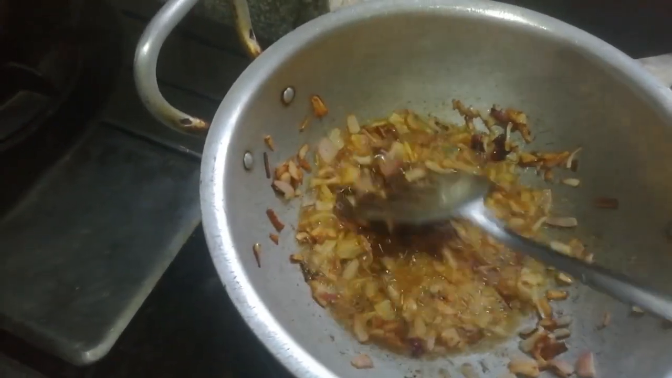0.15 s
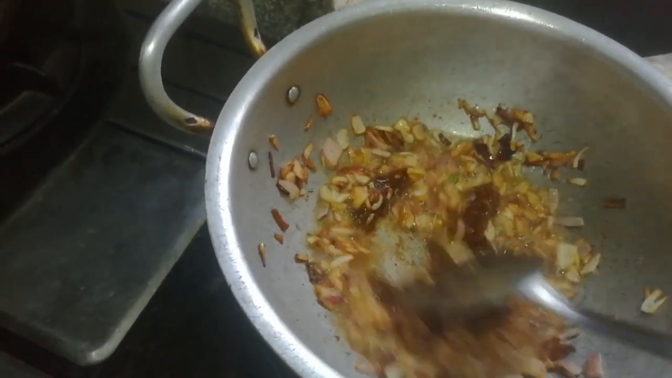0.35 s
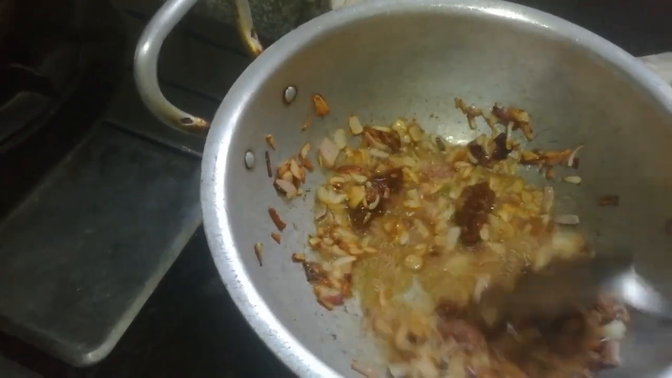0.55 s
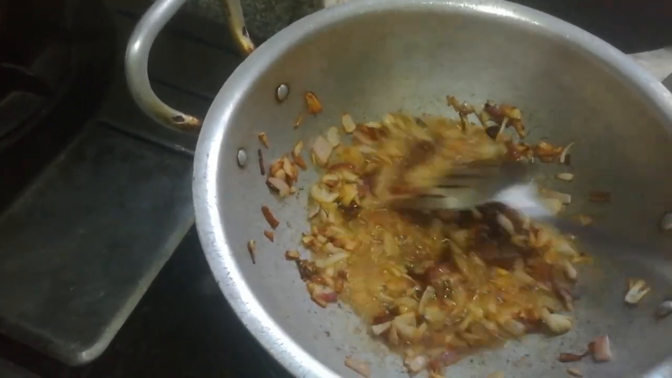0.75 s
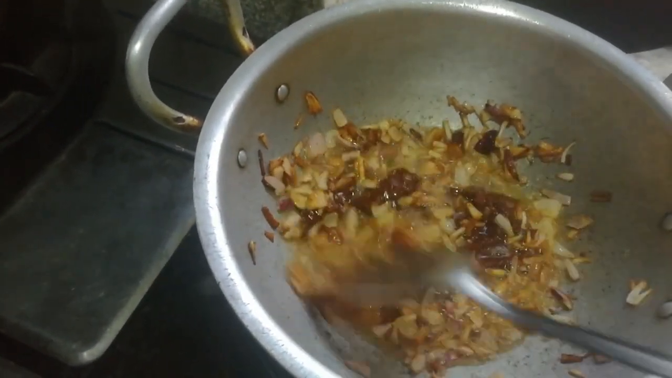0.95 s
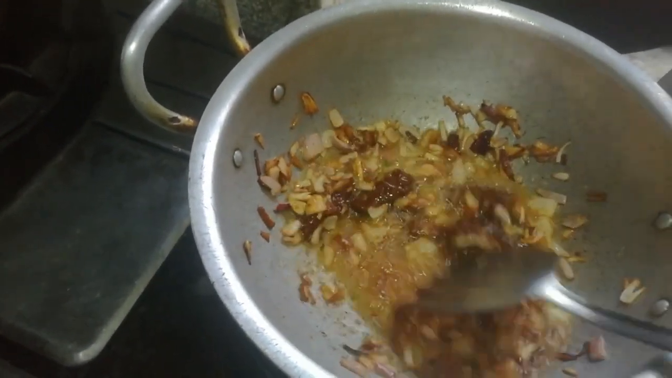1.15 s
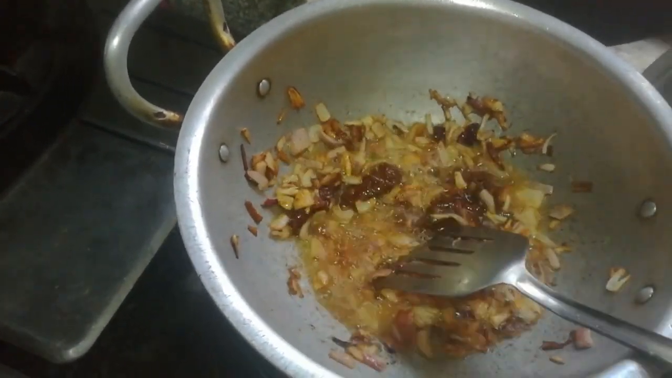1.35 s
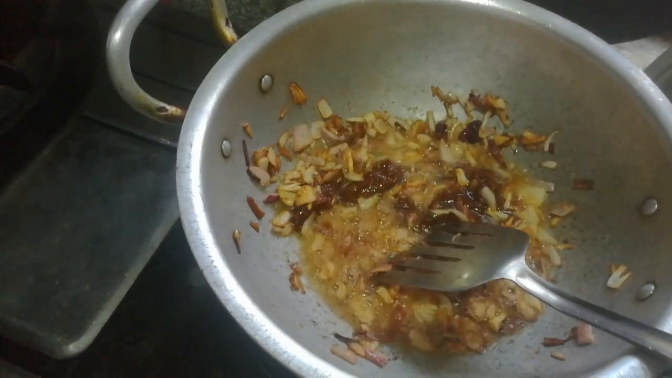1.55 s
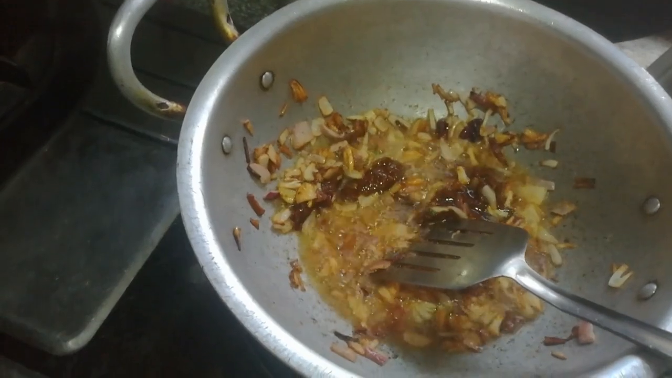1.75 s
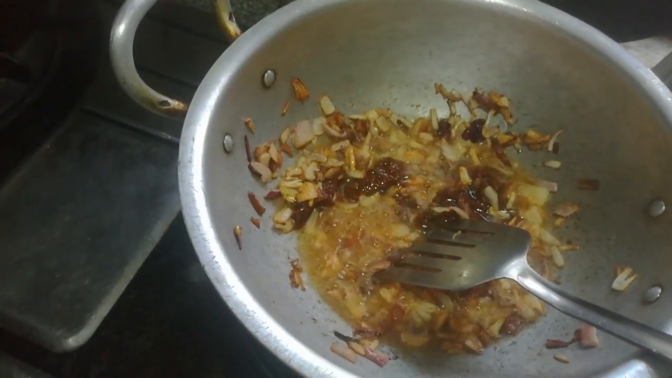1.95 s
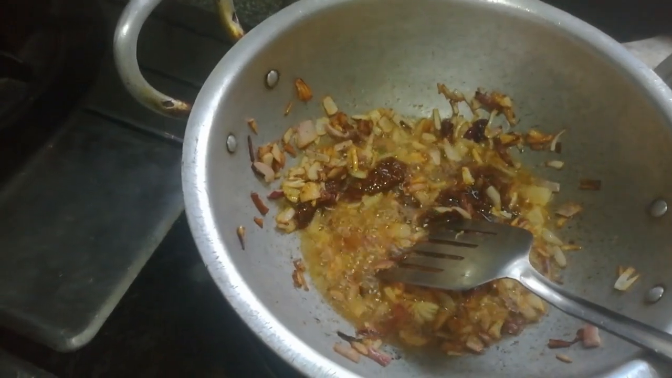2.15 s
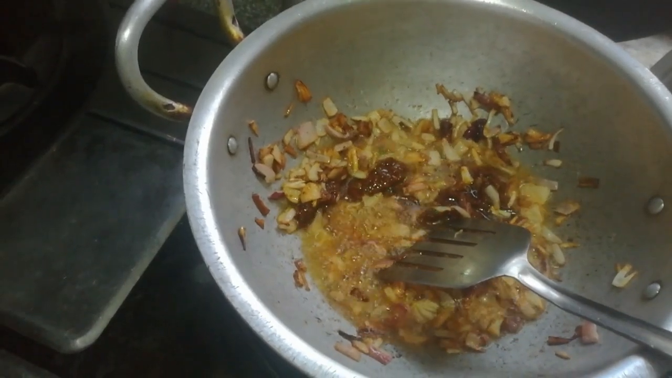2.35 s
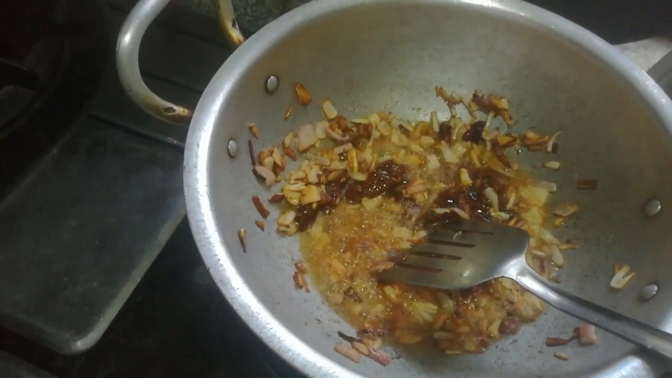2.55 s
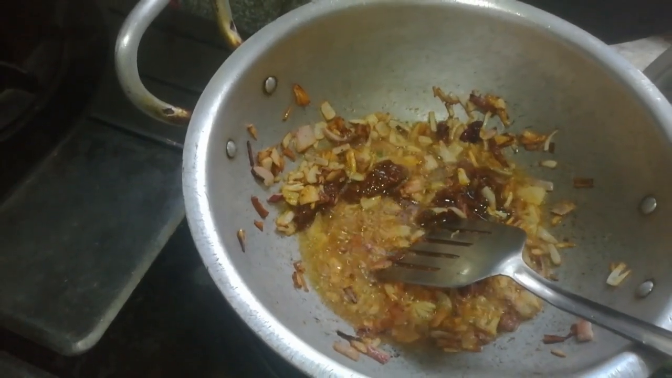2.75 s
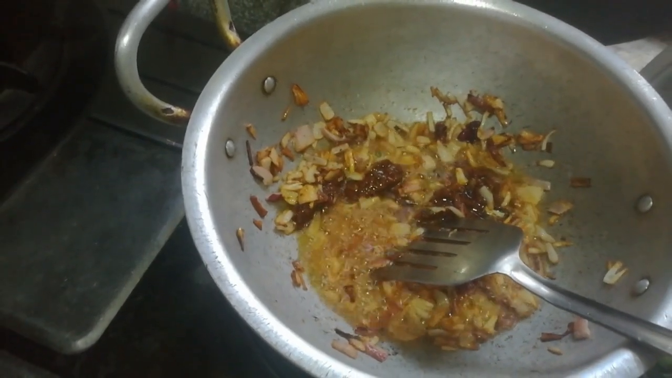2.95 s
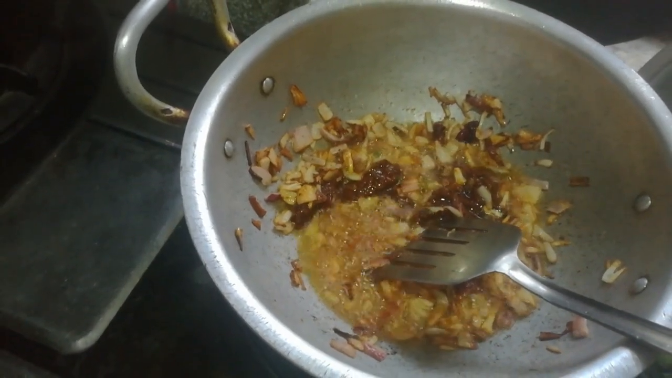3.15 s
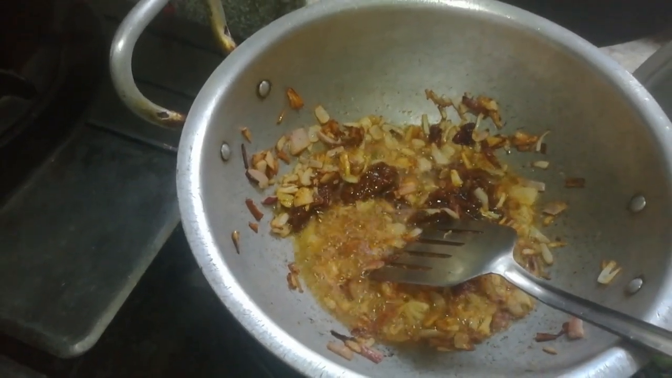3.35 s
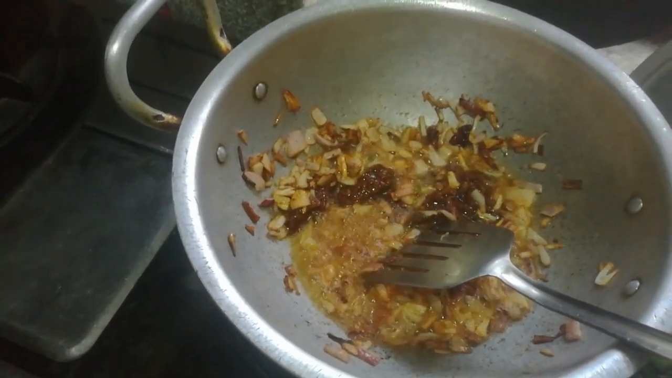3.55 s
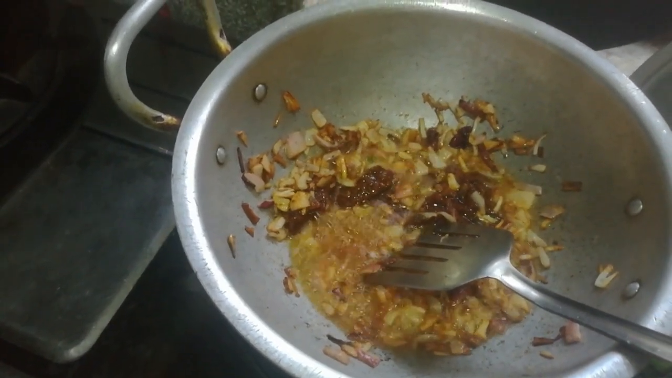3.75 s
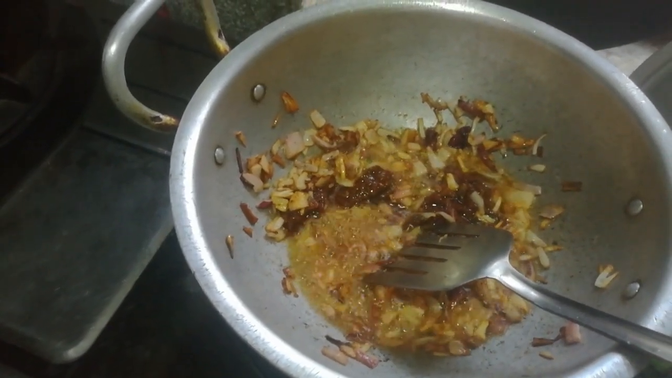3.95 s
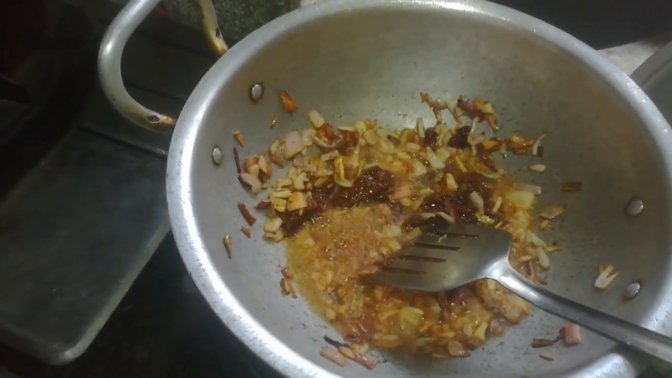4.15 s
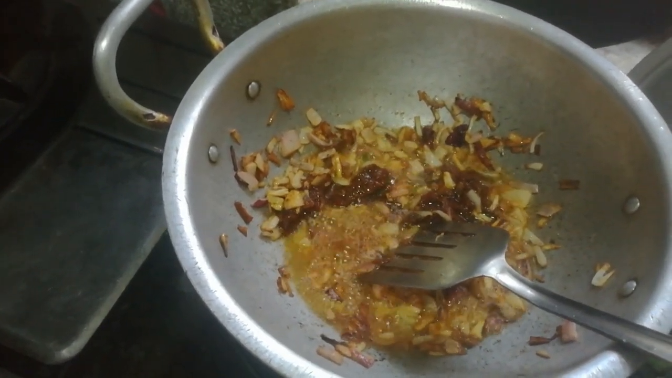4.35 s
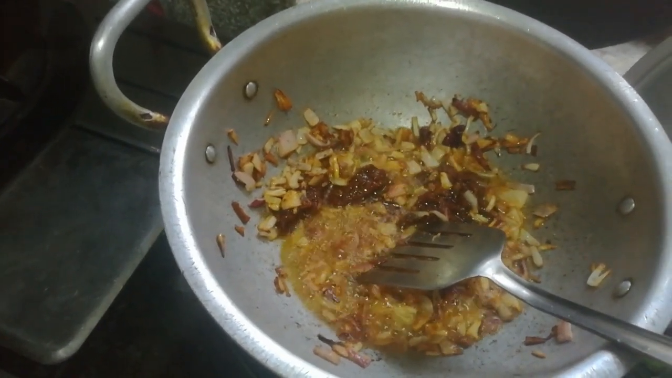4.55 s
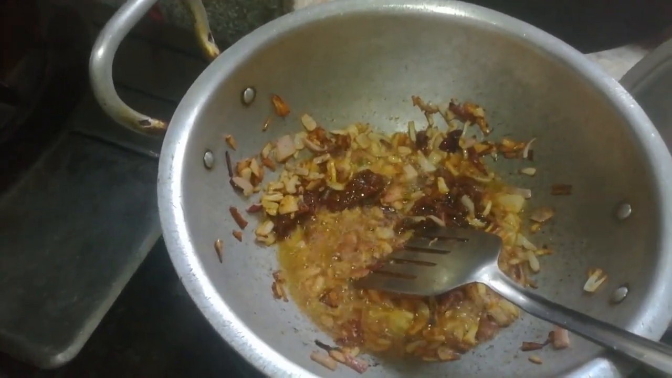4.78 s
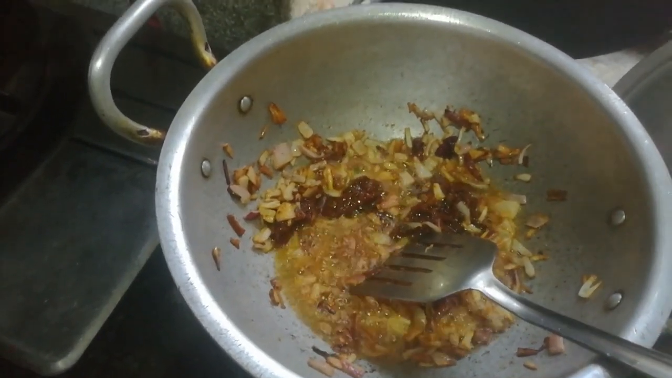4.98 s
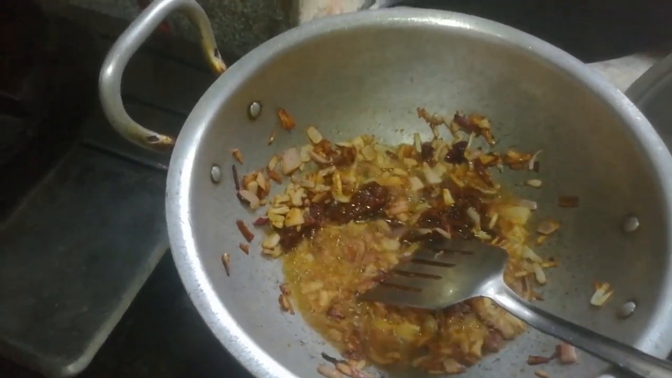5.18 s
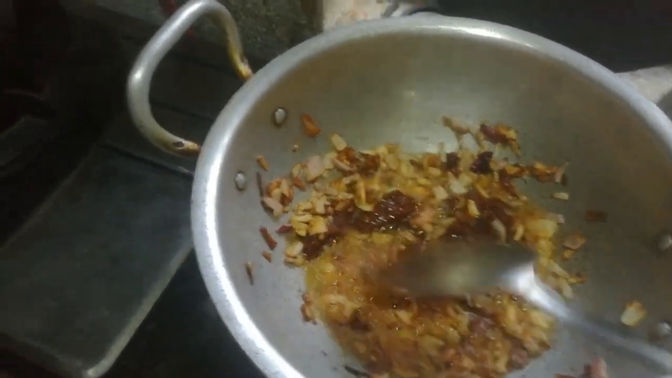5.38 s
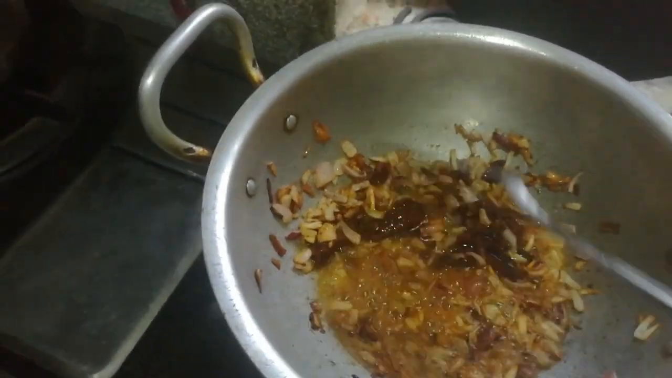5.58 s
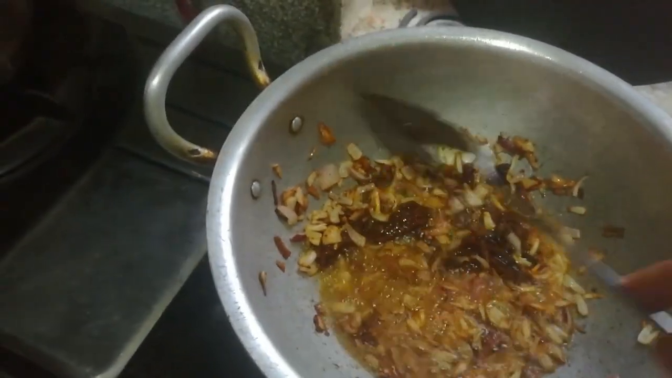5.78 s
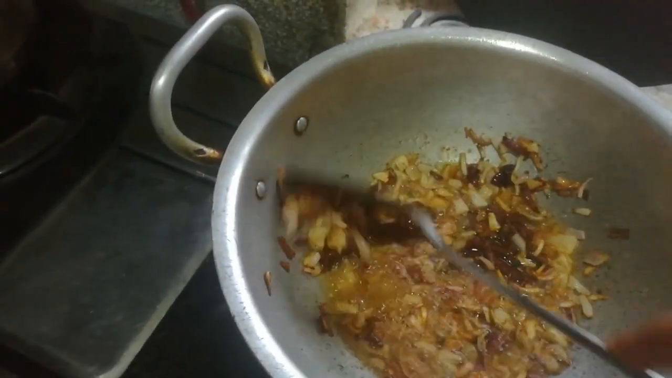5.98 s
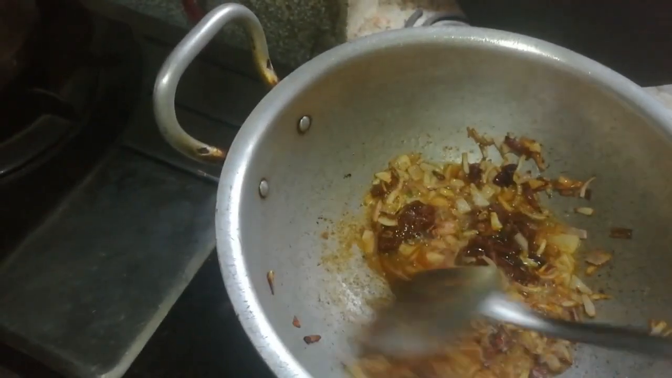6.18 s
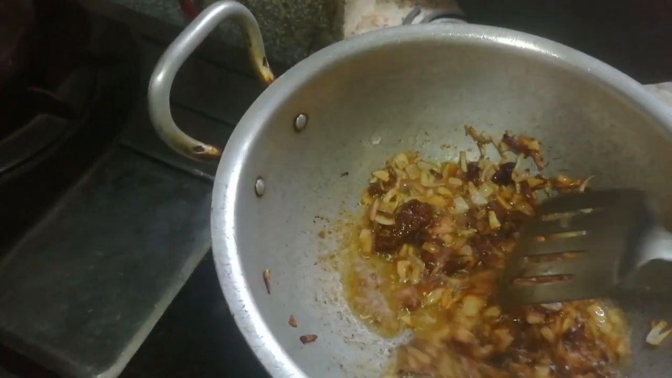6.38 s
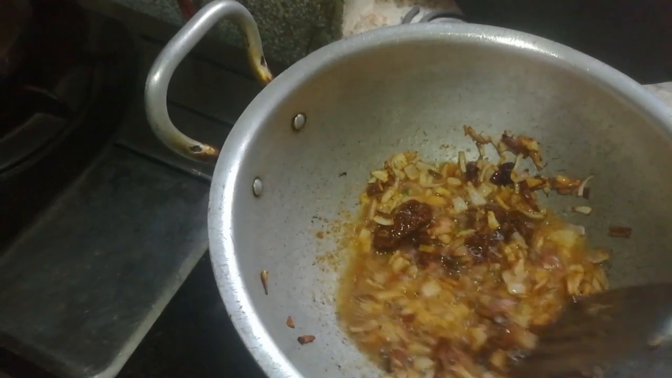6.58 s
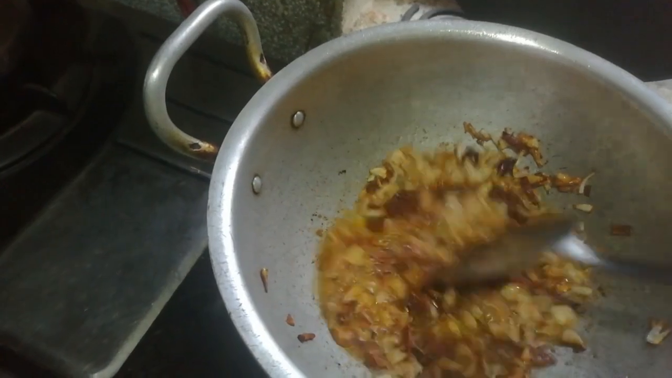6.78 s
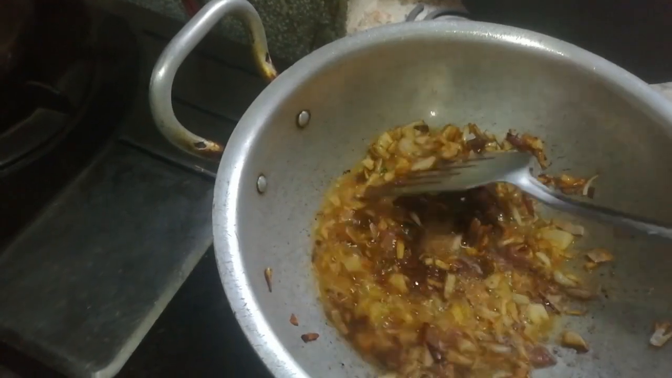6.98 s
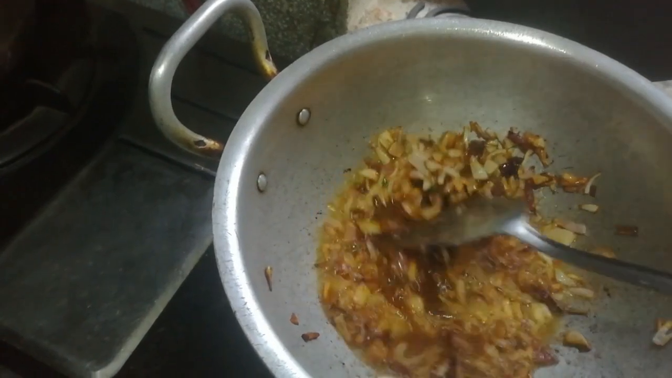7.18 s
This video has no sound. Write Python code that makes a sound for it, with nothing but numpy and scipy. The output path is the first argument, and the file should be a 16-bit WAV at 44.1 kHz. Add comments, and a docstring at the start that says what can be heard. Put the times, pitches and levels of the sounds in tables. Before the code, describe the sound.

Close phone pickup in a small home kitchen: dense sizzling oil with tiny bubbles bursting, bright high spits and woody pops in the bowl of the pan. Short metallic spatula scrapes come early, ending in a clank; then only frying, slowly thinning. A loud knock starts a second bout of scraping against the ringing pan wall, and the sizzle grows lively again over low hum and dull thuds.

```python
"""Onions frying in a deep metal pan

Onions and spice paste fry in oil, heard from close above by a phone with two ports; the far one is shaded.
Dense noise and tiny damped tones make the fizz and bubbling; pitched bursts pop or knock, 9 kHz rings spit.
A slotted steel spatula scrapes and knocks: chattering noise and grains through the metal's resonances.
The kitchen hums low in filtered noise, and a dull damped tone thuds now and then."""
import sys
import numpy as np
from scipy import signal
from scipy.fft import rfft, irfft, next_fast_len
from scipy.io import wavfile
from scipy.ndimage import uniform_filter1d, map_coordinates

SR = 44100
rng = np.random.default_rng(int(sys.argv[2]) if len(sys.argv) > 2 else 0)


def unload_wav(signal):
    """Save mono or channel-first audio to the path in sys.argv[1] as 16-bit WAV at rate SR, clipped to [-1, 1]."""
    wavfile.write(
        sys.argv[1],
        SR,
        np.round(np.clip(np.atleast_2d(signal).T, -1, 1) * 32767).astype(np.int16),
    )


N = 318385  # length of the scene in samples


def amp(db):
    """Decibels to linear gain."""
    return 10 ** (np.asarray(db) / 20)


def unit(x):
    """x brought to rms 1."""
    return x / np.sqrt(np.mean(x ** 2, axis=-1, keepdims=True) + 1e-20)


def along(points, hz):
    """(frequency [Hz], value) points read on a log frequency axis."""
    f, value = np.transpose(points)
    return np.interp(np.log(hz + 1), np.log(f + 1), value)


def curves(rows):
    """One value per sample for each column after the time."""
    s, *columns = np.transpose(rows)
    clock = np.arange(N) / SR
    return [np.interp(clock, s, column) for column in columns]


def wobble(rate):
    """A smooth random curve with this many knots a second."""
    knots = rng.standard_normal(int(N * rate / SR) + 4)
    return map_coordinates(knots, [np.arange(N) * rate / SR])


def filtered(x, response):
    """x times a complex response of frequency."""
    size = next_fast_len(N + SR // 2)
    spectrum = rfft(x, size) * response(np.fft.rfftfreq(size, 1 / SR))
    return irfft(spectrum, size)[..., :N]


def coloured(x, spectrum):
    """x shaped by (frequency [Hz], level [dB]) points and brought to rms 1."""
    return unit(filtered(x, lambda hz: amp(along(spectrum, hz))))


def modal(modes):
    """The response of a set of resonances, with alternating signs."""
    def response(f):
        total = 0
        for k, (centre, width, db) in enumerate(modes):
            peak = 1j * f * width / (centre * centre - f * f + 1j * f * width)
            total = total + (-1) ** k * amp(db) * peak
        return total
    return response


def grains(rate, hz, spread, cycles, scatter_db, most_db):
    """Two unrelated streams of tiny damped tones of random pitch and size, rms 1; rate is per second."""
    draw = rng.random((2, int(rate * N / SR), 3))
    pitch = np.clip(hz * np.exp(spread * (2 * draw[..., 1:2] - 1)), 100, .45 * SR)
    k = np.arange(int(4 * cycles * SR / hz) + 8)
    turn = k * pitch / SR
    size = amp(np.minimum(-scatter_db * np.log(draw[..., 2:]), most_db))
    body = size * np.exp(-turn / cycles) * np.sin(2 * np.pi * turn)
    at = (draw[..., :1] * N).astype(int) + k
    streams = [np.bincount(a.ravel(), b.ravel(), N + len(k))[:N] for a, b in zip(at, body)]
    return unit(np.array(streams))


def add(track, s, burst, echo_db, t60):
    """A burst and its scattered echoes in the bowl; the second row is the echo alone, by another path."""
    t = np.arange(SR // 8) / SR
    tails = rng.standard_normal((2, len(t))) * amp(-60 * t / t60) * (t > .001)
    tails /= np.linalg.norm(tails[0])
    echoes = signal.fftconvolve(burst[None], tails, axes=1)[:, :len(burst)]
    track[:, round(s * SR):][:, :len(burst)] += [burst + amp(echo_db) * echoes[0], echoes[1]]


# room hum: (time [s], rumble level [dB], drone level [dB])
HUM = [(0.0, -69, -60), (0.04, -64, -57), (1.11, -58, -58), (1.35, -65, -54.5), (1.71, -58, -58),
       (2.83, -65, -64), (4.64, -62, -57), (5.27, -61.5, -59.5), (5.73, -63, -58), (6.94, -57.5, -58),
       (7.22, -65, -62)]
# colour of the rumble: (frequency [Hz], level per Hz [dB])
RUMBLE = [(12, -37), (20, -5.5), (54, -0.5), (76, 3.5), (92, 4.5), (108, -4.5), (145, -7.5), (160, -22),
          (210, -39), (350, -120)]
# colour of the drone: (frequency [Hz], level per Hz [dB])
DRONE = [(140, -16.5), (175, -1.5), (220, 12.5), (260, 2.5), (320, -18.5), (500, -20), (700, -42.5)]
# dull thuds: (time [s], level [dB], pitch [Hz])
THUDS = [(0.054, -40, 215), (1.201, -32.5, 230), (1.673, -31.5, 221), (2.091, -39.5, 222),
         (3.301, -36, 204), (3.769, -39.5, 243), (4.347, -38.5, 218), (4.959, -33.5, 214),
         (4.994, -42, 247), (6.35, -36, 228), (6.605, -34.5, 234)]


def kitchen():
    """Rumble and a lumpy drone of filtered noise, and thuds of damped sines, nearly the same at both ports."""
    rumble_db, drone_db = curves(HUM)
    rumble_db = rumble_db + 0.8 * wobble(3)
    lumpy_db = drone_db + 1.6 * wobble(4.12) + 0.78 * wobble(13)
    rumble = amp(rumble_db) * coloured(rng.standard_normal(N), RUMBLE)
    drone = amp(lumpy_db) * coloured(rng.standard_normal(N), DRONE)
    thuds, t = np.zeros(N + SR), np.arange(SR // 4) / SR
    for s, db, hz in THUDS:
        swell = t / 0.011 * np.exp(-t / 0.0097)
        thuds[round(s * SR):][:len(t)] += amp(db + 3) * swell * np.sin(2 * np.pi * hz * t)
    # a little drone in opposite polarity sets the ports apart
    apart = amp(-15.0) * amp(drone_db) * coloured(rng.standard_normal(N), DRONE)
    return rumble + drone + thuds[:N] + np.array([apart, -apart])


# frying: (time [s], fizz level [dB], bubbling level against the fizz [dB])
FRY = [(0.0, -37.5, -5), (0.4, -33, -7), (0.9, -32.5, -6.5), (1.05, -31, -8.5), (1.87, -33, -9.5),
       (2.07, -36, -8.5), (2.73, -35.5, -11.5), (3.42, -37.5, -9), (4.48, -39.5, -8), (5.05, -40.5, -7),
       (5.81, -38, -10), (5.93, -33.5, -9), (7.22, -33, -5.5)]
# colour of the fizz at the near port, which rings at 9 kHz: (frequency [Hz], level per Hz [dB])
FIZZ = [(2500, -17.5), (4300, -17.5), (5300, -18), (6900, -9.5), (8200, -2.5), (9100, 0.5), (9900, 0),
        (10700, -6), (12000, -13), (14200, -13), (15700, -15), (15900, -58)]
# colour of the bubbling in the bowl of the pan: (frequency [Hz], level per Hz [dB])
BUBBLING = [(300, -12), (430, -46), (600, -11), (780, 3.5), (1100, -5.5), (1380, 2.5), (1640, -3),
            (2070, 1.5), (2600, 0), (3450, -4), (4500, -9.5), (6000, -27)]


def frying():
    """Countless small bubbles: a bright fizz of clicks on hiss and a lower bubbling."""
    fizz_db, bubble_db = curves(FRY)
    surge_db = 0.63 * wobble(11.0) + 0.39 * wobble(30)
    hiss = rng.standard_normal((2, 2, N))
    clicks = grains(rate=2000, hz=9000, spread=.6, cycles=1.1, scatter_db=4.5, most_db=21)
    fizz = coloured(1.42 * hiss[0] + clicks, FIZZ)
    blips = grains(rate=600, hz=2200, spread=.8, cycles=.7, scatter_db=4.5, most_db=19)
    blips = unit(filtered(blips, lambda hz: hz))  # low grains live longer: even out their energy
    bubbles = coloured(3.66 * hiss[1] + blips, BUBBLING)
    bubble_db = fizz_db + bubble_db + 0.18 * surge_db + 1.0 * wobble(11)
    return amp(fizz_db + surge_db) * fizz + amp(bubble_db) * bubbles


def scattered(count, over_db, scatter_db):
    """Small events at random: (time [s], level that follows the fizz [dB], a chance value 0-1)."""
    s, size, chance = rng.random((count, 3)).T
    s = s * N / SR
    fizz_db = np.interp(s, *np.transpose(FRY)[:2])
    return s, fizz_db + over_db - scatter_db * np.log(size + 0.081), chance


# sharp bright spits of oil; the one at 1.19 s is the bright edge of the spatula's clank:
# (time [s], level [dB], broad crack against that level [dB])
SPITS = [(0.0994, -26, -26), (0.202, -18, -28), (0.276, -21, -16), (0.7188, -21, -25), (0.9674, -13.5, -21),
         (1.028, -17.5, -32), (1.1905, -17.5, -7.5), (1.6387, -19, -30), (1.6756, -23, -23),
         (1.729, -20, -23), (1.753, -16, -25), (1.7784, -18, -24), (1.8773, -12.5, -33), (1.9926, -24, -13),
         (2.0219, -15, -11), (2.2715, -18.5, -23), (2.588, -21, -33), (3.515, -22, -31), (3.6219, -21, -34),
         (3.734, -24.5, -25), (3.777, -15.5, -21.5), (3.9504, -27, -27), (3.9639, -24.5, -25),
         (4.046, -28, -24), (4.0711, -36, -30), (4.0888, -23, -34), (4.1385, -25.5, -32),
         (4.6688, -15, -27), (5.6287, -15, -16.5), (5.76, -20, -34), (5.8077, -25, -16), (6.3716, -19, -30),
         (6.4605, -17, -26), (6.5235, -20, -22), (6.9068, -19, -13), (7.1162, -28, -16)]


def spits():
    """A spit or clank edge rings the near port for a few cycles, with a crack and a fizzing spray."""
    track, spray, t = np.zeros((2, N + SR)), np.zeros(N + SR), np.arange(SR // 8) / SR
    s, db, chance = scattered(count=30, over_db=8, scatter_db=1.5)
    small = zip(s, db, -25 + 8 * (chance - .5))
    for s, db, crack_db in [*SPITS, *small]:
        swell = t / 0.00011 * np.exp(1 - t / 0.00013)
        ring = swell * np.sin(2 * np.pi * rng.normal(9270, 600) * t)
        crack = 6.6 * amp(crack_db) * np.exp(-t / .0001) * rng.standard_normal(len(t))
        add(track, s, 2 * amp(db) * (ring + crack), echo_db=-8, t60=.03)
        spray[round(s * SR):][:len(t)] += 0.86 * amp(db + crack_db - 60 * t / 0.19)
    return track[:, :N] + spray[:N] * coloured(rng.standard_normal((2, N)), FIZZ)


# sharp pops in the bowl: bubbles bursting, and spatula knocks near 5.63, 5.77 and 5.80 s:
# (time [s], level [dB], pitch [Hz], snap in the bowl against that level [dB])
POPS = [(.2765, -19, 1340, 4), (.507, -26, 1500, -4), (.784, -28, 1280, 2), (1.094, -26, 1820, 2),
        (1.157, -25, 2060, -3), (1.18, -20, 1270, 1), (1.279, -23, 2430, 1), (1.482, -25, 1940, 1),
        (1.702, -24, 1420, 2), (2.0226, -20, 1100, 0), (2.055, -26, 940, 1), (2.096, -23, 1510, 2),
        (2.233, -24, 1300, 5), (2.331, -24, 1520, 4), (2.51, -17, 2000, -4), (2.9948, -13, 1600, 6),
        (3.491, -29, 1450, 2), (3.687, -28, 1300, 5), (3.778, -23, 2030, -4), (3.962, -28, 1300, 2),
        (4.112, -30, 1280, 0.5), (4.608, -30, 1290, 4), (4.669, -29, 1290, 2), (4.89, -20.5, 2440, -4),
        (5.6292, -3, 1320, -2), (5.773, -20, 910, -4), (5.8045, -15, 1290, 3), (6.285, -30, 1480, 2),
        (6.466, -25, 1510, 3), (6.735, -25, 1210, 2), (6.7502, -8, 1650, 0), (6.906, -22, 1430, 1),
        (7.034, -20, 2150, 1), (7.094, -17, 1500, -2), (7.142, -27, 1400, -2)]
# air and metal of the bowl as a burst excites them: (frequency [Hz], width [Hz], level [dB])
BOWL = [(760, 270, 0), (1485, 110, 5), (1977, 250, 1), (2940, 1340, -12)]


def pops():
    """A pop or knock rings for a cycle or two, its pitch sagging, and its snap rings the bowl."""
    track, t = np.zeros((2, N + SR)), np.arange(SR // 8) / SR
    snap = irfft(modal(BOWL)(np.fft.rfftfreq(2 * len(t), 1 / SR)))[:len(t)]
    snap /= np.abs(snap).max()
    s, db, chance = scattered(count=8, over_db=4, scatter_db=2.5)
    lowest_hz, highest_hz = 1220, 2240
    small_hz = lowest_hz + (highest_hz - lowest_hz) * chance ** 2
    small = zip(s, db, small_hz, np.zeros_like(s))
    for s, db, hz, snap_db in [*POPS, *small]:
        turn = hz * t * (0.95 + 0.3 * np.exp(-hz * t / 1.5))
        envelope = 1.7 * np.exp(-hz * t / 1.3) * (1 - np.exp(-hz * t / 0.25))
        burst = -amp(db) * (envelope * np.sin(2 * np.pi * turn) + amp(snap_db) * snap)
        add(track, s, burst, echo_db=-11, t60=0.14)
    return filtered(track[:, :N], lambda f: (1j * f / (550 + 1j * f)) ** 3)  # a bubble is too small for bass


def ringing(x, modes, edge):
    """x through resonances; the flat of the blade wakes the low ones, its edge the high ones."""
    response = modal(modes)
    dull = unit(filtered(x, lambda f: response(f) / (1 + 1j * f / 600) ** 2))
    bright = unit(filtered(x, lambda f: response(f) * (1j * f / (2500 + 1j * f)) ** 2))
    edge = np.clip(edge, 0, 1)
    return np.sqrt(1 - edge) * dull + np.sqrt(edge) * bright


def shifting(x, favoured_hz, patchy_db):
    """As the contact point travels it favours one pitch, and resonances wax and wane in patches."""
    favour_db, favour_octaves = 4.5, .15  # lift at the favoured pitch and how far it spreads
    hz, t, z = signal.stft(x, SR, nperseg=512)
    field = uniform_filter1d(rng.standard_normal(z.shape[1:]), size=5, axis=0)
    field = uniform_filter1d(field, size=10, axis=1)
    favoured = favoured_hz[np.minimum(t * SR, N - 1).astype(int)]
    octaves = np.log2((hz[:, None] + 1) / favoured)
    lift_db = favour_db * np.exp(-(octaves / favour_octaves) ** 2)
    z = z * amp(lift_db + patchy_db * field / field.std())
    return signal.istft(z, nperseg=512)[1][:, :N]


# spatula strokes: (time [s], length [s], level [dB], share on the bare wall [0-1],
# contact from flat of the blade to sharp edge [0-1], pitch the contact point favours [Hz])
STROKES = [(.555, .07, -33, .03, .65, 1800), (.6, .06, -34, 0.06, .45, 1350),
           (0.647, 0.082, -41, 0, .05, 370), (0.876, .055, -35, 0.6, 0.7, 2900),
           (.9, .29, -41, .1, .65, 340), (1.185, 0.097, -40, 0.4, .5, 370),
           (5.127, 0.21, -56.5, .03, 0.2, 370), (5.629, 0.0032, -23, .6, .3, 1300),
           (5.655, .1, -40, .4, .1, 1300), (5.768, 0.035, -32, .9, .05, 800),
           (5.802, .06, -29, .9, .5, 2660), (5.812, .14, -30.5, 0.96, .33, 760),
           (5.95, .09, -32, .8, .5, 2400), (5.97, .17, -37, .6, .02, 450), (6.016, .06, -32, .5, .7, 1800),
           (6.06, .075, -32, .6, .85, 3300)]


def strokes():
    """Every stroke rises, holds and dies away: gain on the wall, gain on the bottom, edge, favoured pitch."""
    attack_share, release_t60 = 0.16, 0.13  # rise as a share of the length; dying away [s]
    s, length, db, share, edge, hz = np.transpose(STROKES)[..., None]
    clock = np.linspace(0, N / SR, num=N // 32)
    t = clock - s
    rise = np.clip(t / (attack_share * length), 0, 1)
    release_db = -60 * np.maximum(t - length, 0) / release_t60
    power = (amp(db + release_db) * rise) ** 2 + 1e-20
    total = power.sum(axis=0)
    share = np.clip(share, 0, 1)
    lead = (power / total) ** 3  # the strongest stroke sets the pitch
    on_wall = np.sqrt((share * power).sum(axis=0))
    on_bottom = np.sqrt(((1 - share) * power).sum(axis=0))
    mean_edge = (edge * power).sum(axis=0) / total
    favoured_hz = (hz * lead).sum(axis=0) / lead.sum(axis=0)
    controls = on_wall, on_bottom, mean_edge, favoured_hz
    return [np.interp(np.arange(N) / SR, clock, c) for c in controls]


# ringing of the bare wall: (frequency [Hz], width [Hz], level [dB])
WALL = [(473, 107, -17.5), (708, 96, -3.5), (790, 110, -1.5), (1284, 68, -2), (1744, 57, 1), (2390, 26, 8),
        (2450, 50, 7.5), (2676, 26, 9.5), (3410, 150, -11), (4210, 46, -13), (4910, 83, -11.5),
        (6450, 74, -12.5), (7100, 73, -18), (7600, 330, -10), (8900, 530, -5.5)]
# ringing of the loaded bottom: (frequency [Hz], width [Hz], level [dB])
BOTTOM = [(361, 27, -9.5), (560, 37, -12), (908, 40, -1), (1324, 76, 0), (1837, 215, 2), (2780, 34, -32),
          (3460, 69, -41), (4340, 20, -38), (4880, 78, -21)]
# the blade strikes the wall: (time [s], level [dB])
CLANKS = [(1.19, -18), (5.804, -31)]
# ringing of the blade: (frequency [Hz], width [Hz], level [dB])
BLADE = [(1575, 31, -5), (1760, 17, -8), (2040, 98, -1), (2670, 28, -2), (3630, 100, -9.5),
         (4200, 110, -4.5), (4960, 110, -2), (6470, 250, -4.5), (9000, 400, -8.5), (9840, 300, -10)]


def slipping():
    """Uneven slips of steel over metal: noise and very short grains."""
    ticks = grains(rate=700, hz=6100, spread=0.39, cycles=0.24, scatter_db=0.0, most_db=12)
    return 0.74 * rng.standard_normal((2, N)) + ticks


def spatula():
    """Steel chatters over metal: slips ring the wall or the loaded bottom of the pan; the blade clanks."""
    on_wall, on_bottom, edge, favoured_hz = strokes()
    chatter_db = 1.1 * wobble(45)
    rasp = ringing(slipping(), BOWL, edge)  # the grit itself, heard through the bowl
    wall = ringing(slipping(), WALL, edge) + 0.44 * rasp
    bottom = ringing(slipping(), BOTTOM, edge) + 0.41 * np.clip(edge, 0, 1) * rasp
    scrape = shifting(on_wall * wall + on_bottom * bottom, favoured_hz, patchy_db=2)
    blows, t = np.zeros(N + SR), np.arange(SR // 4) / SR
    for s, db in CLANKS:
        blows[round(s * SR):][:len(t)] += amp(db - 60 * t / 0.087) * (1 - np.exp(-t / 0.001))
    blade = unit(filtered(rng.standard_normal((2, N)), modal(BLADE)))
    return amp(chatter_db) * scrape + blows[:N] * blade


# phase by which the far port lags: (frequency [Hz], lag [rad])
LAG = [(0, 0), (340, .4), (950, 5.8), (1500, 6.3), (2580, 9.3), (4310, 15.6), (5600, 16.1), (7580, 20.3),
       (10100, 28.2), (16500, 51)]
# share of the sound common to both ports: (frequency [Hz], share [0-1])
ALIKE = [(250, 0.88), (450, 0.94), (900, 0.37), (1500, 0.88), (2200, 0.31), (2800, 0.2), (3400, 0.59),
         (4700, 0.25), (6300, 0.054), (9000, 0.28), (12000, 0.063)]


def ports(pan, shading):
    """The far port hears the pan later, shaded by the phone, and partly by other paths."""
    def bassless(hz):  # a pan is too small to radiate bass
        return (1j * hz / (150 + 1j * hz)) ** 2

    def to_far(hz):
        alike = np.clip(along(ALIKE, hz), 0, 1)
        shade = amp(along(shading, hz)) * np.exp(-1j * np.interp(hz, *np.transpose(LAG)))
        return bassless(hz) * shade * np.array([alike, np.sqrt(1 - alike ** 2)])

    far = filtered(pan, to_far).sum(0)
    return np.array([filtered(pan[0], bassless), far])


# far port against the near one: (frequency [Hz], level [dB])
SHADE = [(250, -4.5), (430, -3.5), (780, -13.5), (950, -6), (1400, -2), (2100, -6.5), (3450, -9.5),
         (4300, -1), (5500, 0.5), (6900, -17), (9000, -23), (10700, -22.5), (12000, -6.5), (14200, 1)]
# the same for the lows of a stroke, which come from the whole pan and reach both ports:
# (frequency [Hz], level [dB])
WHOLE_PAN = [(250, 0.5), (600, -3), (780, -7), (1000, -6.5)]


def scene():
    """Bubbles, spits and spatula reach the ports with their own shading, over the kitchen."""
    above = [point for point in SHADE if point[0] > WHOLE_PAN[-1][0]]
    bursts = ports(frying() + pops() + spits(), SHADE)
    steel = ports(spatula(), [*WHOLE_PAN, *above])
    return bursts + steel + kitchen()


def record(dry):
    """The phone is nearly deaf near its band limit and keeps nothing above it."""
    fade_hz, top_hz = 15830, 16995
    return filtered(dry, lambda hz: np.where(hz < fade_hz, 1, amp(-28)) * (hz < top_hz))


dry = scene()
out = record(dry)
unload_wav(out)
```